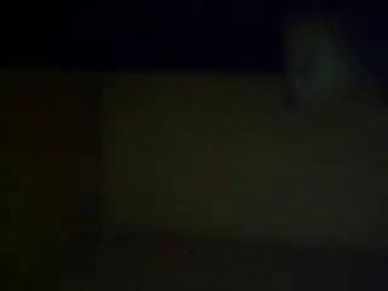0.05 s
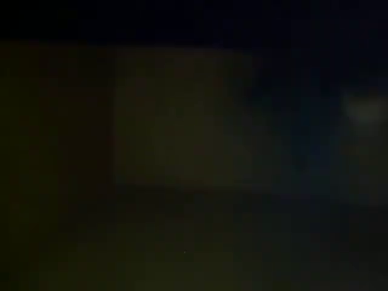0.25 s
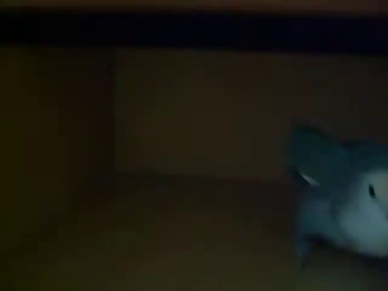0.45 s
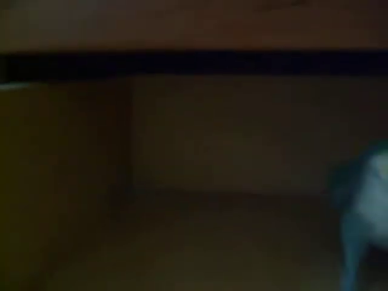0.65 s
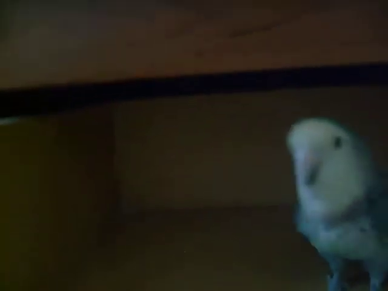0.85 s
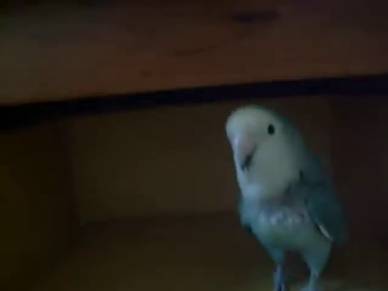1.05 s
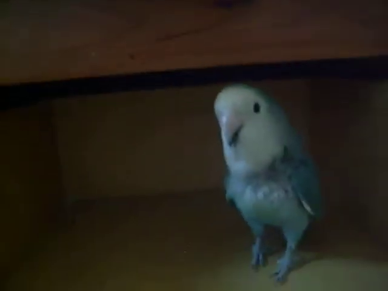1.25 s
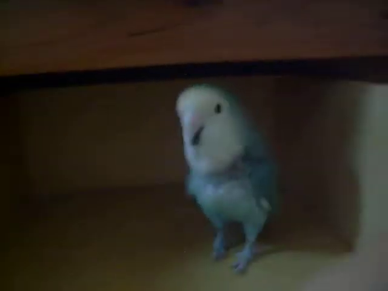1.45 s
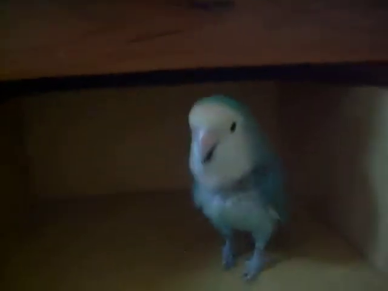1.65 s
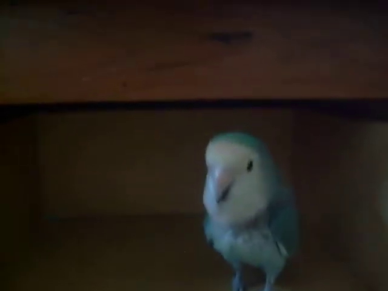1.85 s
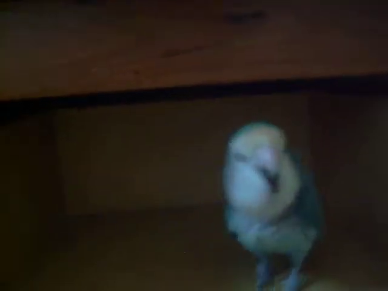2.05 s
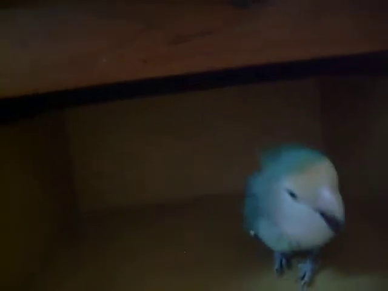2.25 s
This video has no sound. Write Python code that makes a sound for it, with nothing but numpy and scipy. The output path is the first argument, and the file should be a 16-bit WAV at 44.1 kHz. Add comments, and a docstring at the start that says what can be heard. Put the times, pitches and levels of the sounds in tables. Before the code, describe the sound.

A small parrot whistles three quick, high, rising chirps between about 0.2 and 0.4 seconds, close by, after soft handling rustles. Its claws then patter and scratch faintly on wood, with scattered dry clicks. From about 1.6 seconds a wooden drawer scrapes and groans, knocking twice near 2 seconds with a short ring. More scraping and rustling follow until about 2.4 seconds, over faint hiss.

```python
"""A small parrot in a wooden drawer, heard from close by in a faint room.
After soft handling rustles it whistles three quick rising chirps, the first with a raspy after-note.
Its feet patter on the boards with tiny scratches; dry electrical clicks and ticks sound here and there.
From about 1.6 s the drawer scrapes and groans as the wood sticks and slips. Near 2 s it knocks twice,
making the wood ring, and it ends with more scraping and rustling."""
import sys
import numpy as np
from scipy import signal
from scipy.fft import rfft, irfft
from scipy.io import wavfile

SR = 44100
rng = np.random.default_rng(int(sys.argv[2]) if len(sys.argv) > 2 else 0)


def to_wav(s):
    """Save 16-bit WAV."""
    ch = np.atleast_2d(s).T  # columns
    pcm = np.round(np.clip(ch, -1, 1) * 32767)  # PCM
    wavfile.write(sys.argv[1], SR, pcm.astype(np.int16))


N = 105840
T = np.arange(N) / SR  # time of each sample, in seconds
FREQUENCIES = np.arange(N // 2 + 1) * SR / N  # frequency of each point of a spectrum, in Hz


def from_db(db):
    """Turn decibels into a factor to multiply by."""
    return 10 ** (np.asarray(db) / 20)


def rms_one(x):
    """Scale a signal so that its average size (rms) is 1."""
    return x / np.sqrt(np.mean(x ** 2) + 1e-20)


def at_hz(points, hz):
    """Read between the rows of a frequency table, with octaves evenly spaced."""
    f, value = np.transpose(points)
    return np.interp(np.log(hz + 1e-9), np.log(f), value)


def colour(x, spectrum):
    """Make some frequencies stronger than others, then scale to rms 1."""
    return rms_one(irfft(rfft(x) * from_db(at_hz(spectrum, FREQUENCIES)), N))


def lowpass(x, hz, order=2):
    """Soften everything above hz; a higher order cuts more steeply."""
    return signal.sosfilt(signal.butter(order, hz, fs=SR, output="sos"), x + 1e-18)


def highpass(x, hz, order=2):
    """Soften everything below hz."""
    return signal.sosfilt(signal.butter(order, hz, "high", fs=SR, output="sos"), x + 1e-18)


def wobble(hz):
    """A smooth random wavering of rms 1, up to about hz fast."""
    return rms_one(lowpass(rng.standard_normal(N), hz))


def click(start, db):
    """A click one sample long."""
    return from_db(db) * (np.arange(N) == int(start * SR))


def grains(per_s, spread_db):
    """Tiny clicks of uneven size at random times."""
    sizes = from_db(spread_db * np.minimum(rng.exponential(1, N), 4)) * rng.choice([-1, 1], N)
    return sizes * (rng.random(N) < per_s / SR)


def envelope(start, length, attack_s, release_s):
    """A loudness curve that rises, holds and then dies away."""
    return np.clip((T - start) / attack_s, 0, 1) * np.exp(-np.maximum(T - start - length, 0) / release_s)


def ring(start, hz, db, t60):
    """A struck tone; t60 is the time in seconds it takes to fade by 60 dB."""
    age = np.maximum(T - start, 0)
    return from_db(db - 60 * age / t60) * np.sin(2 * np.pi * hz * age)


def through(x, response):
    """Play a sound through an object or space, given its answer to one click."""
    return signal.fftconvolve(x, response)[:N]


def reverb(x, t60, delay_s):
    """Many echoes of a sound, blurred into one fading tail."""
    tail = rng.standard_normal(N) * from_db(-60 * T / t60) * (T > delay_s)
    return through(x, rms_one(tail) / np.sqrt(N))


def room_hiss():
    """A faint, steady hiss behind everything."""
    # tone colour of the hiss: f/Hz, relative level/dB
    spectrum = [(30, -2.5), (100, -5), (450, -3), (1800, -6), (3100, 8.5), (4500, -5.5), (6000, -13),
                (10000, -15.5), (12500, -31.5)]
    return from_db(-65.5) * colour(rng.standard_normal(N), spectrum)


def rumble():
    """Handling makes a low rumble, strongest around the knocks."""
    # loudness over time: t/s, level/dB
    loudness = [(0, -66), (.35, -70), (.5, -90.5), (1.31, -85), (1.34, -65), (1.93, -68.5), (2.1, -54.5),
                (2.4, -88)]
    # tone colour of the rumble: f/Hz, relative level/dB
    spectrum = [(25, -10.5), (55, -4), (100, -7), (400, -37.5), (4000, -100)]
    return from_db(np.interp(T, *np.transpose(loudness))) * colour(rng.standard_normal(N), spectrum)


def scratches():
    """Claws and grit scratch the wood in small swells of high noise."""
    # scratches: middle t/s, half length/s, level/dB
    strokes = [(0.54, 0.0044, -68), (0.582, 0.007, -60), (0.645, 0.0024, -64.5), (0.691, 0.0038, -62.5),
               (1.745, 0.014, -54), (1.334, 0.034, -73)]
    level = sum(from_db(db) * np.exp(-((T - middle) / width) ** 2) for middle, width, db in strokes)
    return level * gritty(rng.standard_normal(N))


def gritty(x):
    """Give a sound the thin, high colour of grit on wood."""
    return colour(x, [(1000, -25), (3380, -5), (6760, 0), (10500, -3), (12500, -30)])


def rustles():
    """Handling makes brief rustles, each a swell of tiny clicks."""
    # rustles: t/s, length/s, level/dB
    brushes = [(0, 0.08, -50), (0.079, 0.018, -38.5), (0.121, 0.048, -48), (0.156, 0.044, -37.5),
               (0.459, 0.25, -60), (0.848, 0.13, -56), (1.088, 0.029, -67.5), (1.295, 0.067, -50),
               (1.496, 0.093, -50.5), (1.724, 0.022, -32), (1.855, 0.032, -31), (2.357, 0.12, -35)]
    # tone colour of a rustle: f/Hz, relative level/dB
    spectrum = [(60, -27), (450, -9), (1800, -4.5), (2300, 3.5), (3500, 10), (4100, -9), (5000, -6.5),
                (5600, -15.5), (10000, -37.5), (12500, -56)]
    level = sum(from_db(db) * envelope(start, length, attack_s=0.28 * length, release_s=0.011)
                for start, length, db in brushes)
    return level * colour(grains(per_s=1000, spread_db=1.5), spectrum)


def ticks():
    """Electrical clicks and thin ticks, all dry: they do not ring the wood."""
    # loud clicks among the chirps: t/s, level before filtering/dB
    loud_clicks = [(.3024, 6), (0.3692, -1)]
    # thin, dry electrical ticks: t/s, level before filtering/dB
    thin_ticks = [(.069, -26), (0.102, -29), (.136, -26), (0.335, -27), (.503, -37.5), (.736, -39),
                  (1.338, -38), (1.404, -39.5), (1.501, -31.5), (1.769, -23.5), (1.803, -14.5),
                  (1.9359, -24), (2.2026, -28.5), (2.236, -20), (2.303, -22)]
    loud = sum(click(start, db) for start, db in loud_clicks)
    thin = highpass(sum(click(start, db) for start, db in thin_ticks), 3800)
    return -lowpass(loud + thin, 9600, order=12)


def wood_response(dense_db):
    """The drawer's answer to a click: a few clear tones over a dense, noisy ringing."""
    # the wood's own tones: f/Hz, relative level/dB, fade time t60/s
    modes = [(272, -5.5, 0.1), (348, 1.5, 0.21), (478, -8, 0.28), (544, -1.5, 0.16), (702, -12.5, 0.12),
             (918.3, -2.5, .11), (1150, -4.5, .11), (1554, -10, 0.13), (1864.5, -1.5, 0.072),
             (2320, -7, 0.048), (3149, 1.5, 0.12), (3389, -4, 0.063)]
    # colour of the dense ringing: f/Hz, relative level/dB
    spectrum = [(40, -11), (150, -7.5), (280, 1.5), (700, 1), (1150, -1.5), (1350, -4.5), (2600, -2),
                (3300, 6.5), (4000, -6.5), (5000, -19.5), (10000, -39.5), (12500, -47.5)]
    # how long the dense ringing lasts: f/Hz, fade time t60/s
    fade_times = [(100, 0.29), (500, 0.13), (3000, 0.063), (10000, 0.079)]
    tones = sum((-1) ** k * ring(0, hz, db + 3.6 * rng.standard_normal(), t60)
                for k, (hz, db, t60) in enumerate(modes))
    noise_spectrum = rfft(colour(rng.standard_normal(N), spectrum))
    dense = np.zeros(N)
    for low_hz in 20 * 2. ** np.arange(11):  # each octave fades at its own speed
        octave = irfft(noise_spectrum * (FREQUENCIES >= low_hz) * (FREQUENCIES < 2 * low_hz), N)
        dense += octave * from_db(-60 * T / at_hz(fade_times, low_hz * np.sqrt(2)))
    onset = 1 - np.exp(-(T / 0.00035) ** 2)  # the wood takes a moment to start ringing
    return onset * (from_db(-32) * tones + from_db(dense_db) * rms_one(dense) / np.sqrt(N))


def footfalls():
    """Feet and light taps strike the boards: clicks with their treble and deep bass softened."""
    # taps: t/s, relative level/dB, brightness f/Hz
    taps = [(.066, -7.5, 7970), (0.259, -4.5, 2200), (0.269, -1, 2003), (0.58, -16, 3060),
            (0.765, -21.5, 2040), (0.946, -23, 3970), (0.9589, -17.5, 9100), (1.337, -15.5, 1290),
            (1.446, -10.5, 1790), (1.465, -11.5, 700), (1.577, -7, 2950), (1.62, 1.5, 880),
            (2.233, -5, 4320), (2.394, -1, 3980)]
    return sum(highpass(lowpass(click(start, db), hz, order=1), 0.15 * hz, order=1)
               for start, db, hz in taps)


def sliding():
    """Wood rubs on wood in many tiny slips, faint until the drawer slides."""
    # strength of the rubbing: t/s, relative level/dB
    strength = [(0, -51), (.22, -57.5), (.45, -68.5), (.7, -75), (1.05, -80.5), (1.3, -69.5), (1.35, -59),
                (1.41, -57.5), (1.46, -53.5), (1.555, -44.5), (1.585, -28.5), (1.70, -34.5), (1.745, -28.5),
                (1.775, -33), (1.885, -32), (1.91, -58), (1.96, -51.5), (2.16, -43), (2.21, -38.5),
                (2.26, -33), (2.31, -42), (2.345, -52), (2.4, -26)]
    # tone colour of the slips: f/Hz, relative level/dB
    spectrum = [(180, -3), (345, -5), (460, 6), (900, -1), (1500, 1.5), (3200, 1.5), (5000, 2.5),
                (10000, -1)]
    slips = colour(grains(per_s=1800, spread_db=4), spectrum)
    catching_db = 2.5 * wobble(37)  # the runner keeps catching and letting go
    return slips * from_db(np.interp(T, *np.transpose(strength)) + catching_db)


def groans():
    """Sticking wood groans and squeaks in short, unsteady tones."""
    # groans and squeaks: t/s, length/s, f/Hz, level/dB
    judders = [(0, 0.097, 516, -52.5), (0.067, 0.004, 1600, -29), (0.113, 0.0089, 2546, -36),
               (0.693, 0.11, 1510, -67), (0.951, 0.041, 519, -57.5), (1.453, 0.028, 450, -41.5),
               (1.581, 0.055, 866, -36), (1.821, 0.043, 1187, -33), (2.229, 0.036, 420, -27.5),
               (2.234, 0.081, 250, -37), (2.351, 0.066, 416, -35)]
    sound = np.zeros(N)
    for start, length, hz, db in judders:
        level = from_db(db) * envelope(start, length, attack_s=0.0047, release_s=0.38 * length)
        flutter = 1 + 0.65 * wobble(37)
        pitch_hz = hz * (1 + 0.028 * wobble(80))
        sound += level * flutter * np.sin(2 * np.pi * np.cumsum(pitch_hz) / SR)
    return sound


def knocks():
    """Each knock of the drawer rings the wood, with a low thump and a gritty, fading rattle."""
    # hard knocks: t/s, strike level/dB, rattle level/dB, thump level/dB
    hits = [(1.9847, 12.5, -53.5, -14), (2.0717, 12, -61, -14.5)]
    rattle_t60_s = 0.13
    grit = gritty(grains(per_s=2200, spread_db=4))
    sound = np.zeros(N)
    for start, db, rattle_db, thump_db in hits:
        wood = through(click(start, db), wood_response(dense_db=-1))
        thump = ring(start, hz=282, db=thump_db, t60=0.025)
        rattle = grit * (T > start) * from_db(rattle_db - 60 * np.abs(T - start) / rattle_t60_s)
        sound += wood + thump + rattle
    return sound


def inside_drawer(x):
    """A sound together with its quick echoes off the drawer's walls."""
    # wall echoes: delay/s, relative level/dB
    walls = [(.0013, -14), (.0029, -14), (.0047, -8.5), (.019, -28.5)]
    echoes = sum(from_db(db) * np.interp(T - delay, T, x) for delay, db in walls)
    return x + echoes + from_db(-18.5) * reverb(x, t60=0.16, delay_s=walls[0][0])


def parrot():
    """Each chirp is a rough rising whistle; a second voice close in pitch makes it pulse."""
    # notes: t/s, length/s, starting f/Hz, top f/Hz, level/dB, roughness/0-1,
    # second voice f/Hz, its relative level/dB, relative level of the octave above/dB
    chirps = [(0.238, 0.02, 2937, 3704, -8.5, 0.46, 2896, -3, -34),
              (0.264, 0.0093, 3260, 3360, -16.5, 0.6, 3700, -15.5, -26.5),
              (0.307, 0.0046, 3720, 3966, -14, 0.25, 3260, 3.5, -17.5),
              (0.3635, 0.013, 3655, 4308, -17, 0.21, 3536, 2.5, -22)]
    rise_from, rise_to = 0.23, 0.92  # the pitch climbs between these shares of the length
    sound = np.zeros(N)
    for start, length, low_hz, top_hz, db, roughness, second_hz, second_db, octave_db in chirps:
        progress = (T - start) / length
        rise_hz = (top_hz - low_hz) * np.clip((progress - rise_from) / (rise_to - rise_from), 0, 1)
        waver_hz = roughness * 346 * wobble(330)
        phase = 2 * np.pi * np.cumsum(low_hz + waver_hz + rise_hz) / SR
        second_phase = 2 * np.pi * np.cumsum(second_hz + waver_hz + 0.3 * rise_hz) / SR  # climbs less
        whistle = np.sin(phase) + from_db(octave_db) * np.sin(2 * phase)
        second_voice = from_db(second_db) * np.sin(second_phase)
        rasp = roughness * from_db(-26) * rng.standard_normal(N)
        flutter = 1 + roughness * wobble(330)
        level = from_db(db) * envelope(start, length, attack_s=0.001, release_s=0.004)
        sound += level * flutter * (whistle + second_voice + rasp)
    return inside_drawer(sound)


def microphone(x):
    """The small microphone loses the deep bass and the highest treble."""
    return lowpass(highpass(x, 120), 11000, order=14)


def scene():
    """Bird and drawer in a quiet room, on one channel."""
    foreground = parrot() + knocks()
    soft_response = from_db(-5) * wood_response(dense_db=3.5)
    boards = through(footfalls() + sliding(), soft_response)  # both ring the same wood
    near = microphone(foreground + boards + groans() + rustles() + scratches())
    room = from_db(-25) * reverb(near, t60=0.5, delay_s=0.0011)
    return (near + room + ticks() + rumble() + room_hiss())[None]


def record(dry):
    """The loudest peaks overload the microphone and are rounded off; the very top treble is cut."""
    ceiling, cutoff_hz = 0.73, 16400
    rounded = dry / (1 + (dry / ceiling) ** 6) ** (1 / 6)
    return signal.sosfilt(signal.cheby2(12, 70, cutoff_hz, fs=SR, output="sos"), rounded)


dry = scene()
out = record(dry)
to_wav(out)
```